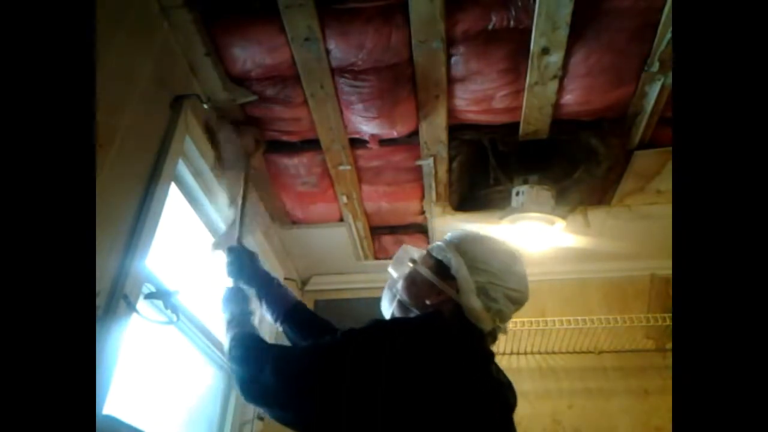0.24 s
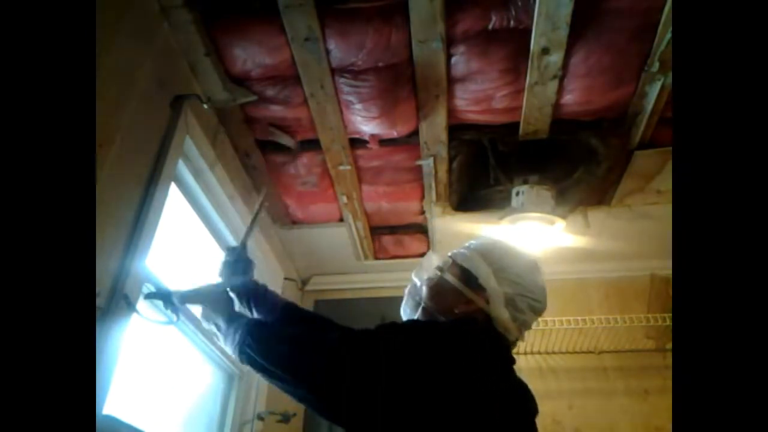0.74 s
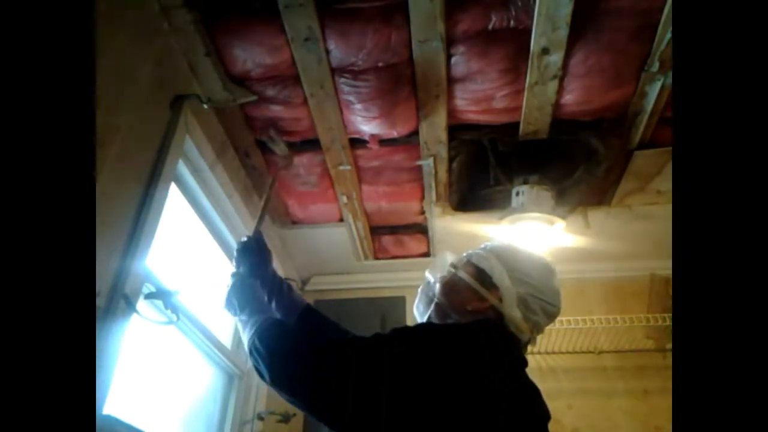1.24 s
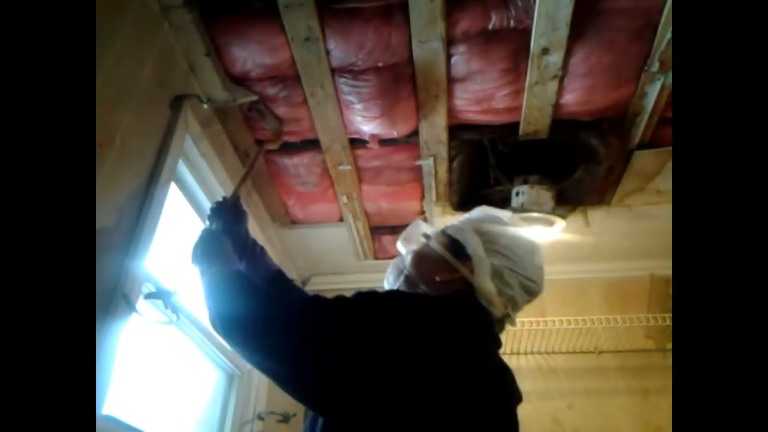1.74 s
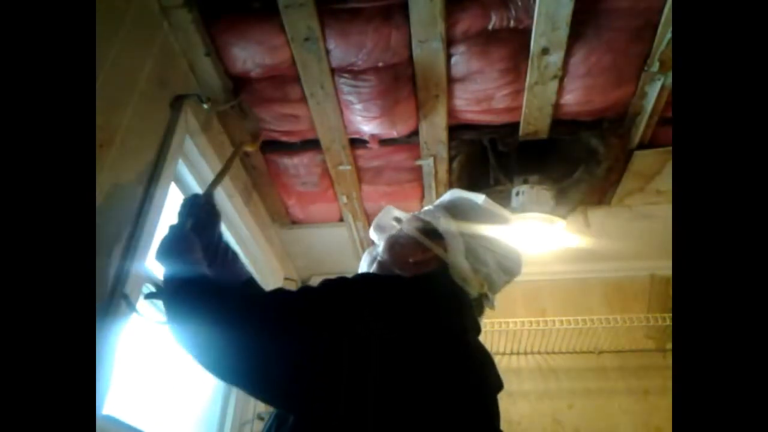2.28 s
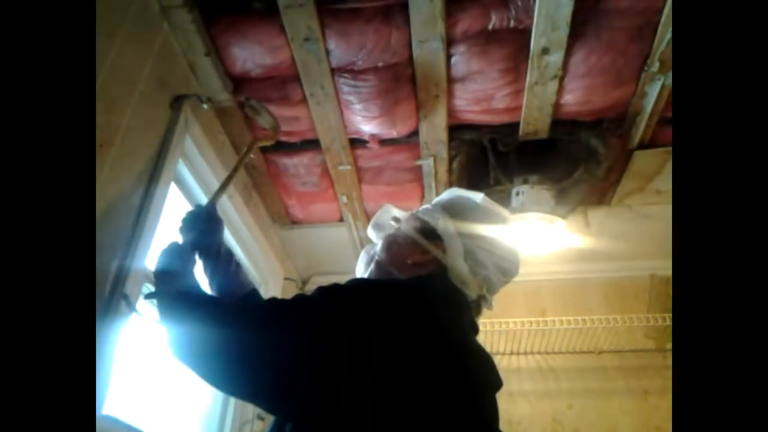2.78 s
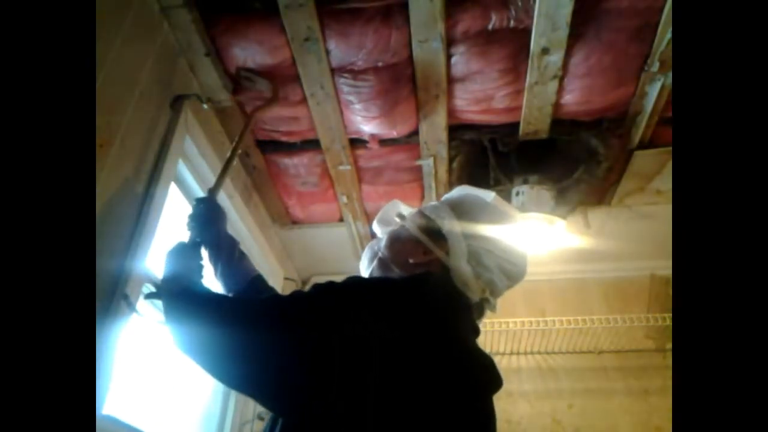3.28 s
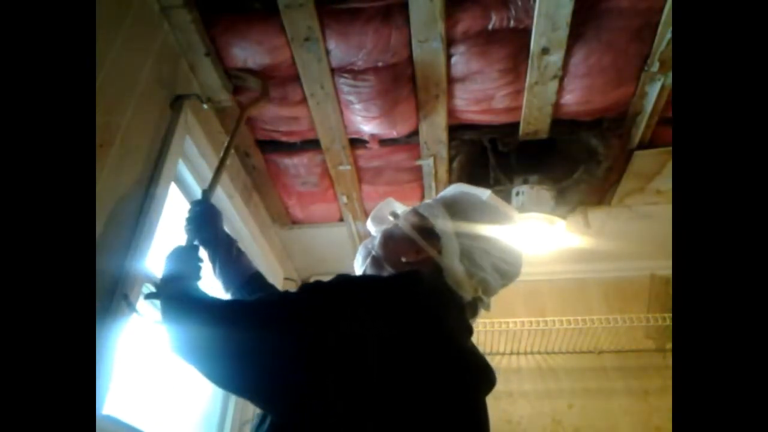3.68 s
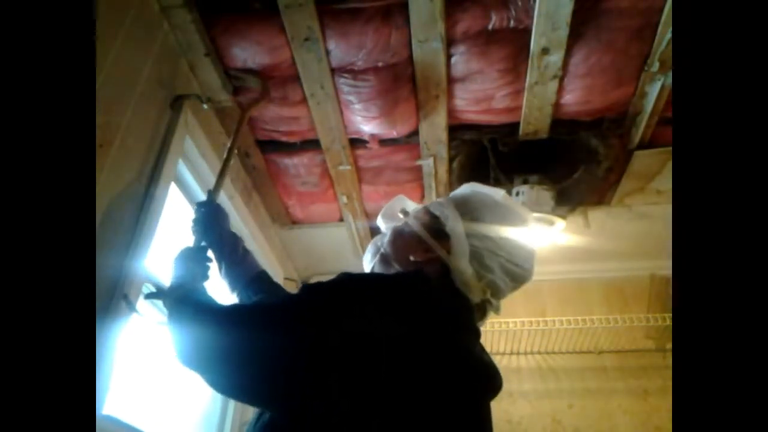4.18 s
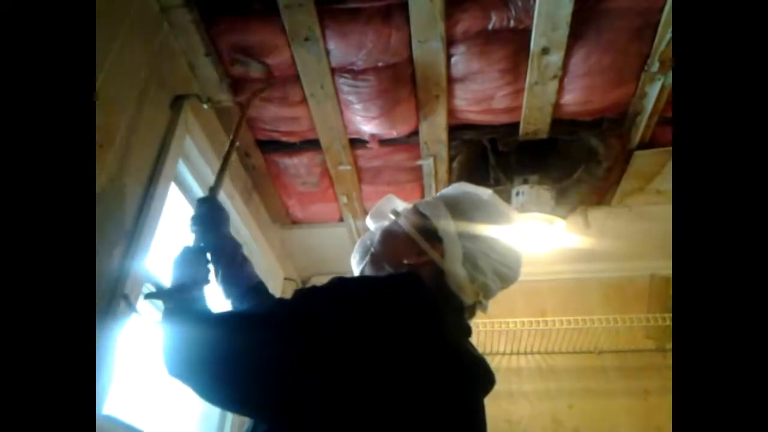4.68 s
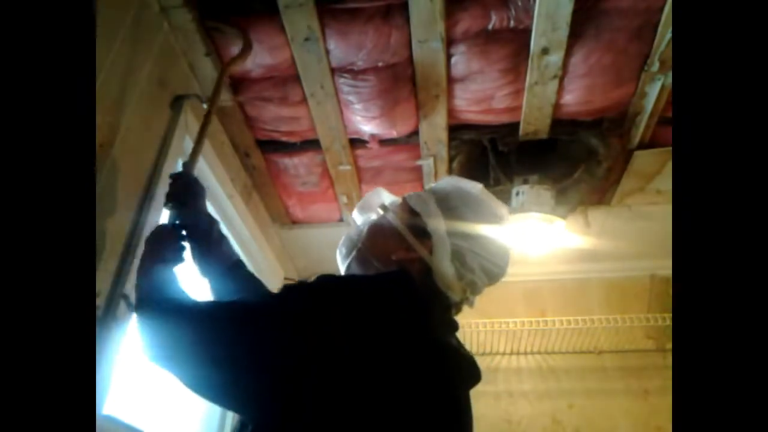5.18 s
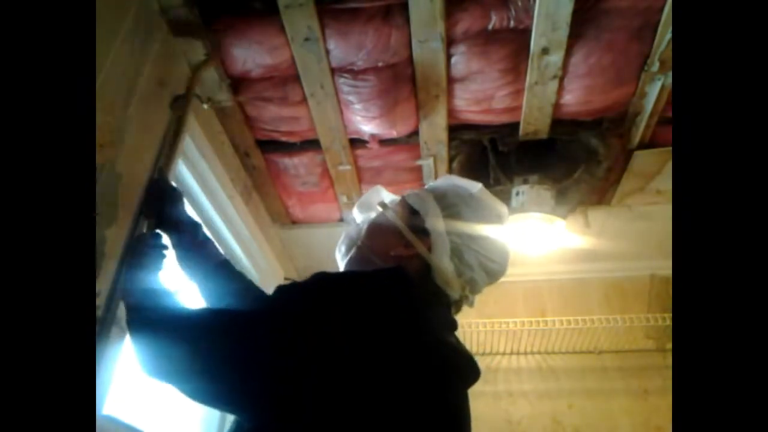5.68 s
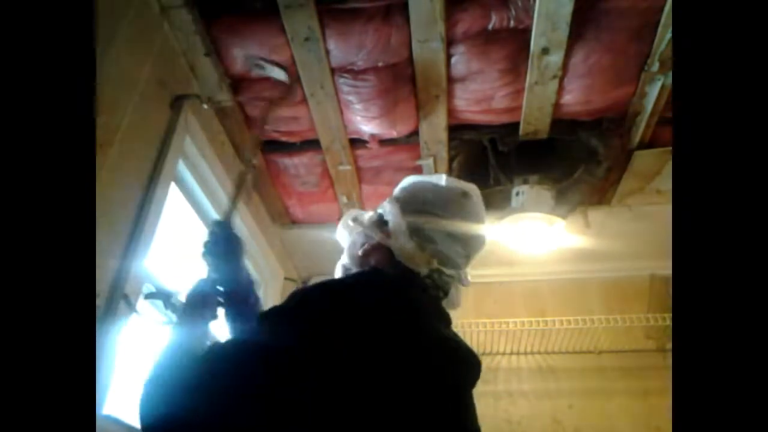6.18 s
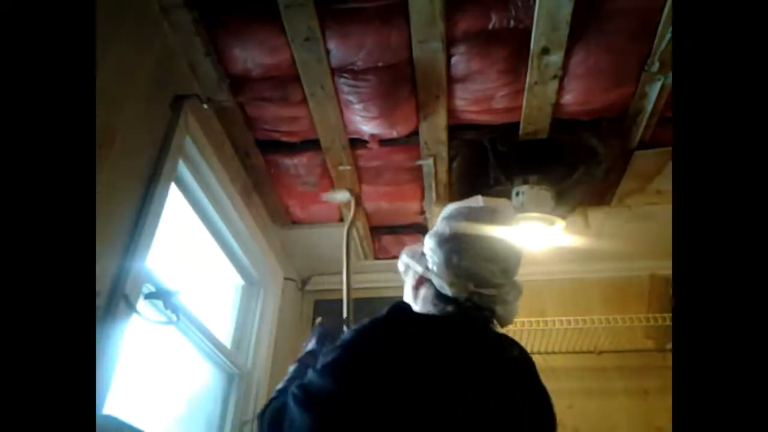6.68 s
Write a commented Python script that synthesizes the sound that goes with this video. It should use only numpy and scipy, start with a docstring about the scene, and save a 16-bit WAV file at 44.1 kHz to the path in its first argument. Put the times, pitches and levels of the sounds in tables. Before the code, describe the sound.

Someone pries at an opened ceiling with a metal bar: clustered woody bangs, gritty drags, crumbling fizz and quieter pauses in a small room.

```python
"""A steel crowbar knocks, hooks and drags along the laths and joists of an opened ceiling in a small hard room.
Each blow is a burst of noise that cracks and shakes the boards, with fading sines for the thud in the joists.
The dragging bar is a stream of random clicks, filtered into scrape, rumble and fizz of crumbs and thin top hiss.
Over a soft room tone, two close microphone ports hear it all, the right one a moment sooner."""
import sys
import numpy as np
from scipy import signal
from scipy.io import wavfile
from scipy.ndimage import uniform_filter1d

SR = 44100
rng = np.random.default_rng(int(sys.argv[2]) if len(sys.argv) > 2 else 0)


def transcribe(u):
    """Save the signal u as a 16-bit wav file named by the first command-line argument.

    u: samples, shape (n,) or (channels, n), limited to [-1, 1]; the rate is SR.
    q: integer samples, one column per channel.
    """
    v = np.clip(np.atleast_2d(u).T, -1, 1)
    q = np.round(v * 32767).astype(np.int16)
    wavfile.write(sys.argv[1], SR, q)


N = 306054  # length of the scene in samples

# Spectra that set only the balance of a sound: (frequency [Hz], level [dB per Hz])
# Quiet sound of the room, and noise of the microphone ports
ROOM_TONE = [(18, -23), (30, -14), (53, -23), (82, -30.5), (146, -11), (309, 1), (777, -5), (1950, 1),
             (2520, 0), (3260, 6.5), (5000, -21.5), (6500, -44.5), (11000, -120)]
PORT_HISS = [(20, -4), (60, -19), (150, -12.5), (400, -4.5), (1900, -9.5), (3300, -15), (8000, -8),
             (13000, -7.5), (15000, -6.5)]
# Scraping: gritty lath, shaken joists, fizzing crumbs, thin hiss at the top of the treble
GRIT = [(410, -42.5), (700, -10.5), (787, -21), (933, -9), (1350, -8.5), (1500, -8.5), (2100, -5),
        (2580, 0.5), (2870, 6), (5010, -20), (6000, -31.5), (7800, -41.5), (13200, -120)]
RUMBLE = [(53, -54), (90, -26), (136, -8), (187, 1), (437, 5.5), (786, -5), (900, -7), (1170, -55.5),
          (1980, -120)]
CRUMBS = [(3240, -25.5), (5500, -5), (6020, -7), (6840, -7), (8440, -5), (10000, -12), (13000, -41.5),
          (22000, -120)]
TOP_HISS = [(5880, -30.5), (10000, 1.5), (10700, -9.5), (13900, 7.5), (15000, -8.5)]
# Blows: splintering crack, shaken boards, hard bright edge (also used for the chips)
CRACK = [(900, -19.5), (1600, -10.5), (2000, 7), (2400, 7), (3000, 13), (3600, 3.5), (4200, 1.5),
         (5000, -3.5), (6500, -10.5), (10000, -49)]
BOARD = [(350, -19), (600, 0), (698, -5), (760, -4.5), (889, -3.5), (993, -3), (2000, -4.5), (2600, -45.5),
         (4400, -120)]
EDGE = [(2590, -26), (4400, 7.5), (5690, -5.5), (6140, -6.5), (8230, -12), (10100, -26), (14100, -25),
        (15000, -32)]
# How long echoes take to drop by 60 dB, never under 0.05 s: (frequency [Hz], time [s])
ECHO_TIME = [(100, 0.33), (260, 0.12), (700, 0.28), (1840, 0.27), (4850, 0.3), (8000, 0.35), (11000, 0.036)]
# Response of the small capsule behind its port: (frequency [Hz], gain [dB])
CAPSULE = [(20, -15), (60, -17.5), (100, -13), (130, -1.5), (1700, -5), (2000, -6.5), (2550, -5.5),
           (2950, -13.5), (3300, -7.5), (3800, -4.5), (5000, -4)]
# Blurred noise that follows the sound, different left and right: (frequency [Hz], gain [dB])
BLUR = [(30, -2.5), (70, -5), (150, -22), (1000, -30), (3000, -17), (6000, -26), (9000, -15), (14000, -1.5)]
# Ringing tones of the joists; RING_FACTOR scales the times to drop by 60 dB:
# (frequency [Hz], level [dB], unscaled time [s])
JOISTS = [(150, -7, 0.053), (165, 0, 0.1), (227, 6, 0.064), (264.2, 2, 0.079), (314.4, 9, 0.056),
          (365.6, 0.5, 0.066), (422.8, 8, 0.057), (465.5, 0, 0.088), (510.4, -3, 0.13), (552.2, -4, 0.11),
          (627, 4.5, 0.048)]
# Drags of the bar: (loudest time [s], swell [s], fade [s], drag level [dB],
#  rumble over drag [dB], fizz over drag [dB])
STROKES = [(0.029, 0.09, 0.043, -31.5, -7.5, -14.5), (0.127, 0.036, .02, -24.5, -21, -15.5),
           (0.445, 0.12, 0.027, -34.5, -5, -12), (0.815, .12, .02, -41, -14, -22),
           (0.945, .05, 0.022, -44, -8, -16), (1.285, 0.15, 0.046, -46.5, -39, -20),
           (1.57, 0.18, 0.65, -23.5, -8.5, -30), (1.77, 0.03, 0.19, -35, -24, -14),
           (1.901, 0.098, .04, -31.5, -5, -17), (2.139, 0.19, 0.067, -29.5, -15.5, -17),
           (2.19, 0.15, 0.031, -26, -29, -31), (2.34, 0.16, 0.5, -29, -16.5, -18),
           (2.47, 0.13, 0.02, -31, -24, -10.5), (2.92, 0.02, 0.36, -49.5, -16, -33),
           (3.071, 0.14, 0.025, -44, -12.5, -13), (3.194, .03, 0.048, -44, -10, -11),
           (3.341, 0.11, 0.038, -35, -2.5, -41), (3.501, 0.17, 0.026, -26, -11, -20),
           (3.649, 0.08, 0.17, -35.5, -18, -21), (3.799, 0.041, 0.052, -45, -11, -27),
           (3.88, 0.023, 0.072, -54, -21, -32), (3.995, 0.13, 0.024, -41.5, -18, -18),
           (4.159, 0.062, 0.9, -43.5, -34, -8.5), (4.328, 0.21, 0.29, -37, -12, -26),
           (4.795, .02, 0.045, -57, -2, -9), (4.96, 0.056, 0.025, -29.5, -20, -20),
           (5.08, 0.071, .1, -53, -26, -25), (5.23, 0.1, 0.031, -39, -17.5, -15),
           (5.341, 0.058, 0.24, -42, -18, -16), (5.67, 0.087, 0.028, -24.5, -9.5, -19),
           (5.99, 0.079, 0.12, -51.5, -7, -20), (6.172, 0.11, 0.066, -40, -12.5, -23),
           (6.39, 0.028, 0.018, -60, -7, -26), (6.455, 0.03, .12, -67, -16, -14.5),
           (6.65, 0.34, .02, -40, -22, -21), (6.74, 0.025, 0.15, -50, -3, -11),
           (6.935, 0.037, 0.034, -43.5, -10.5, -20.5)]
# Blows of the bar: (time [s], crack level [dB], crack pitch [Hz], thud level [dB], thud centre [Hz],
#  board level [dB], board pitch [Hz], edge level [dB], contact fade [s], extra room level [dB],
#  rise [s], steel snap over crack [dB], thud breadth [octaves])
BLOWS = [(0.0034, -29.5, 2650, -36.5, 468, -38, 1510, -59, 0.0027, -2, 0.007, -18, 0.94),
         (0.14, -15, 2260, -17.5, 420, -19, 1510, -41, 0.013, 3.5, 0.0033, -12.5, 0.8),
         (0.2436, -26, 2560, -26.5, 286, -33.5, 1160, -36, 0.012, 1.5, 0.0025, -14, 0.72),
         (0.318, -32.5, 3600, -33, 310, -35, 875, -38.5, 0.0095, 2, 0.0032, -5, 0.78),
         (0.391, -17, 3070, -45, 347, -39, 1700, -26.5, 0.014, 2.5, 0.0024, -8, 0.8),
         (0.4574, -11.5, 2760, -22.5, 255, -17.5, 1060, -23.5, 0.011, 14, 0.0041, -4, 0.8),
         (0.4696, -10.5, 2536, -26, 581, -14.5, 1020, -33, 0.01, -1.5, 0.003, -5, 0.97),
         (0.5721, -28.5, 4100, -36.5, 593, -34, 950, -43, 0.011, 4, 0.0045, -4, 0.76),
         (0.675, -29, 2530, -35, 270, -34.5, 950, -38, 0.0041, 10.5, 0.0031, -17, 0.94),
         (0.825, -20.5, 4090, -34, 466, -31, 1540, -24.5, 0.012, 7.5, 0.0033, -17, 0.8),
         (0.955, -18.5, 2800, -50, 252, -36, 1200, -27, 0.018, 9.5, 0.0017, -14, 0.64),
         (1.2145, -46, 2810, -70, 323, -72, 1540, -82.5, 0.008, -2.5, 0.0037, -6, 0.8),
         (1.3898, -13, 2820, -19, 533, -21.5, 1500, -35.5, 0.013, -5.5, 0.0034, -12, 1),
         (1.4015, -11, 2620, -12, 381, -21, 1550, -19, 0.008, 2.5, 0.0024, -9.5, 1),
         (1.4469, -2, 2730, -11.5, 530, -13, 869, -11.5, 0.0074, 5, 0.003, -4, 0.98),
         (1.5693, -28, 2670, -41, 565, -18, 1390, -45, 0.009, 4.5, 0.0028, -11, 0.92),
         (1.5897, -20, 2480, -25, 244, -22, 980, -46, 0.0094, 12, 0.0023, -12, 0.54),
         (1.7497, -25, 3320, -41, 283, -32, 1240, -36, 0.008, 14, 0.0036, -4, 0.73),
         (1.919, -32, 3060, -18, 252, -30.5, 910, -46, 0.0093, 0.5, 0.0035, -8, 0.87),
         (2.19, -25.5, 2490, -35, 215, -41.5, 999, -32.5, 0.0071, 0.5, 0.0042, -5, 0.91),
         (2.3736, -24.5, 3140, -38, 450, -32, 1100, -29.5, 0.0071, 3.5, 0.0038, -1, 0.93),
         (2.4209, -27.5, 2880, -34.5, 600, -37.5, 1380, -28.5, 0.006, 1.5, 0.0023, -8, 0.74),
         (2.462, -18.5, 2480, -37, 223, -28, 1280, -35.5, 0.008, -10.5, 0.0031, -7, 0.59),
         (2.5035, -7.5, 2670, -12.5, 420, -11, 1200, -36, 0.0035, -1, 0.0031, -3.5, 0.72),
         (2.5124, -12.5, 2610, -16, 307, -10, 1105, -24, 0.0044, -1, 0.0029, 1.5, 0.68),
         (2.524, -15, 1890, -9, 464, -26.5, 1200, -31.5, 0.008, 10, 0.003, -8, 0.57),
         (2.5477, -20.5, 2360, -20, 428.4, -19.5, 1240, -27, 0.008, 2.5, 0.003, -1, 0.5),
         (2.677, -24, 2430, -31, 390, -30, 1030, -39, 0.0073, -0.5, 0.00304, -5.5, 0.86),
         (2.7329, -16.5, 4220, -21, 493, -25, 1590, -32, 0.0077, -5.5, 0.0021, -3.5, 0.9),
         (2.751, -24.5, 2560, -25, 580, -22, 980, -30.5, 0.0063, -1, 0.0033, -10, 0.94),
         (3.0826, -29.5, 1975, -39, 328, -37, 1490, -63, 0.0084, -1.5, 0.003, -7, 0.69),
         (3.2543, -3, 2630, -20.5, 547, -13.5, 1400, -23, 0.016, 3.5, 0.0032, -15, 1),
         (3.4032, -29, 3250, -45, 353, -38.5, 1790, -51, 0.0067, 9, 0.003, -2, 0.8),
         (3.5151, -15.5, 2500, -17.5, 190, -20.5, 695, -23.5, 0.0064, -0.5, 0.0022, -5, 1),
         (3.5228, -9, 2450, -16, 342, -20, 880, -40, 0.01, -2, 0.0037, -16, 0.97),
         (3.9816, -38.5, 3230, -64, 594, -66, 1450, -56, 0.008, -6, 0.0028, -13, 0.94),
         (3.9895, -50.5, 2440, -64, 355, -53, 1560, -45, 0.0061, -3, 0.003, -8, 0.8),
         (4.117, -41.5, 2580, -63, 240, -55, 1800, -46.5, 0.011, -1, 0.0032, -8, 0.8),
         (4.146, -35, 2500, -65, 517, -47, 1800, -44, 0.007, 3, 0.003, -8, 0.8),
         (4.1704, -31, 3480, -62, 598, -54, 1520, -48.5, 0.0072, 5, 0.0027, -7, 0.8),
         (4.2426, -32.5, 2580, -61.5, 598, -51, 1720, -34, 0.0051, 13.5, 0.003, -6, 0.8),
         (4.359, -28, 4200, -49, 567, -38.5, 1480, -32, 0.0065, 2, 0.003, -6, 0.8),
         (4.4319, -9.5, 2105, -8.5, 400, -13, 1480, -41, 0.0027, 7, 0.003, -4.5, 0.8),
         (4.4494, -12, 3280, -11, 437, -16, 1490, -35, 0.0038, 4, 0.0031, -3.5, 0.87),
         (4.789, -43, 4230, -60, 533, -51.5, 1170, -64, 0.01, 3, 0.0032, -2.5, 0.8),
         (4.899, -46, 3160, -71, 560, -54, 1220, -49, 0.0098, 12, 0.003, -4, 0.76),
         (4.9735, -22.5, 2410, -30.5, 297, -31.5, 1410, -33, 0.008, 0.5, 0.003, -11, 0.94),
         (5.066, -38, 2520, -67, 390, -56, 1180, -63, 0.011, 1, 0.003, -5, 0.8),
         (5.2145, -38, 2700, -56, 234, -47.5, 1660, -62, 0.011, -8, 0.003, -14, 0.68),
         (5.2962, -27.5, 2470, -50, 445, -37, 1600, -54, 0.008, 6.5, 0.004, -17, 0.93),
         (5.4043, -21, 2830, -40.5, 220, -34, 1600, -30.5, 0.013, -3.5, 0.0035, -8, 1),
         (5.4224, -27.5, 3470, -35, 161, -38, 1370, -45, 0.006, -4, 0.0024, -8, 1),
         (5.582, -39, 2480, -55, 576, -47.5, 1710, -46, 0.0072, 9, 0.0021, -10, 0.8),
         (5.7403, -9, 2490, -9, 338, -13, 1770, -15, 0.008, -5, 0.0018, -7, 0.77),
         (5.7444, -14.5, 2090, -14, 269, -12, 1060, -18.5, 0.004, 3.5, 0.0039, -3, 0.58),
         (5.7734, -10, 2440, -12, 416, -12.5, 1300, -35, 0.0055, 7.5, 0.0038, -16, 0.52),
         (5.8064, -14.5, 2470, -9.5, 294, -14.5, 1540, -37, 0.0039, -2.5, 0.0038, -11.5, 0.88),
         (6.249, -50.5, 2500, -68, 326, -57, 1600, -66, 0.008, 2.5, 0.003, -1, 0.8),
         (6.325, -39, 2200, -77, 546, -49.5, 1484, -52, 0.015, 9, 0.0031, -5, 0.96),
         (6.437, -44, 2115, -70, 410, -57, 1596, -56, 0.018, 6, 0.004, -7, 0.8),
         (6.585, -39, 2750, -65, 344, -53, 1120, -57, 0.008, -1, 0.0028, -10, 0.88),
         (6.665, -24.5, 3140, -53, 540, -34.5, 1440, -45, 0.0059, 4.5, 0.0039, -2, 0.91),
         (6.749, -44, 3280, -59, 331, -45, 1780, -56, 0.008, 8, 0.003, -8, 0.8),
         (6.904, -50.5, 2320, -68, 505, -50, 1800, -62, 0.0042, 4, 0.003, -4, 0.8)]

ROOM_TONE_DB, HISS_DB = -57, -61.5
SWELL_DB = 25.5  # level change over one swell or fade time
TOP_HISS_DB = -6.5  # top hiss relative to crumbs
CHIPS_PER_S, CHIP_DB = 300, -15.5  # chips that snap under the hook; level relative to grit
RING_FACTOR = 0.9
KNOCK_DB = -7.0  # first knock relative to the thud
PORT_LAG = 1  # delay of the left port in samples
CUT_HZ = 14650  # top of the recorded band


def gain_of(db):
    """Turns decibels into a plain multiplier."""
    return 10 ** (np.asarray(db) / 20)


def evened(x):
    """Brings the average strength (RMS) to one."""
    return x / np.sqrt(np.mean(x ** 2) + 1e-20)


def read(points, hz):
    """Reads a table between its points, on a logarithmic frequency scale."""
    table_hz, value = np.transpose(points)
    return np.interp(np.log(hz + 1), np.log(table_hz + 1), value)


def add(mix, s, sound):
    """Adds a sound at a time in seconds, cut off at the end of the mix."""
    part = mix[round(s * SR):][:len(sound)]
    part += sound[:len(part)]


def colour(x, points):
    """Filters with the given spectrum, never below -90 dB, without sounding ahead of the input."""
    hz = abs(np.fft.fftfreq(8192, 1 / SR))
    log_gain = np.log(gain_of(np.maximum(read(points, hz), -90)))
    # The phase comes from the log gain, so the energy arrives as early as it can.
    spectrum = np.exp(np.conj(signal.hilbert(log_gain)))
    taps = np.fft.ifft(spectrum).real[:3000]
    taps = taps[(None,) * (x.ndim - 1)]
    return signal.fftconvolve(x, taps, axes=-1)[..., :x.shape[-1]]


def favour(x, centres_hz, sharpness, rest):
    """Lifts each row around its own pitch, like a resonance, and keeps some of the rest."""
    rows = []
    for row, hz in zip(x, centres_hz):
        b, a = signal.iirpeak(hz, sharpness, SR)
        rows.append(rest * row + signal.lfilter(b, a, row))
    return np.array(rows)


def ping(hz, t, turns):
    """A sine that swells until the given number of turns, then dies away."""
    cycles = hz[:, None] * t
    return np.sin(2 * np.pi * cycles) * cycles * np.exp(-cycles / turns)


def peaked(x, db):
    """Sets the loudest 9 milliseconds or so of each row to its level."""
    top = uniform_filter1d(x ** 2, 400, axis=1).max(1, keepdims=True)
    return x * gain_of(db)[:, None] / np.sqrt(top + 1e-20)


def room(count, wet_db, first_s):
    """Direct sound and dense echoes of random sign, each band dying at its own speed; one row per spot."""
    shape = (count, SR // 2)
    taps = rng.choice([-1., 1.], shape) * (rng.random(shape) < .3)
    hz, t, bands = signal.stft(taps, SR, nperseg=256)
    echo_time = np.maximum(read(ECHO_TIME, hz), .05)[:, None]
    tail = signal.istft(bands * gain_of(-60 * t / echo_time), SR, nperseg=256)[1]
    tail *= np.clip(np.arange(tail.shape[1]) / (first_s * SR), 0, 1)  # echoes build up
    tail *= gain_of(wet_db) / np.linalg.norm(tail, axis=1, keepdims=True)
    tail[:, 0] = 1  # direct sound
    return tail


def room_tone():
    """Steady noise with the spectrum of the quiet room."""
    return gain_of(ROOM_TONE_DB) * evened(colour(rng.standard_normal(N), ROOM_TONE))


def drag():
    """The hook rubs over grit: dense uneven clicks that ring the lath, shake the joists and fizz."""
    size = gain_of(1.5 * np.minimum(rng.exponential(1, (4, N)), 5)) * rng.standard_normal((4, N))
    clicks = size * (rng.random((4, N)) < 3000 / SR)  # about 3000 a second in each layer
    spectra = (GRIT, RUMBLE, CRUMBS, TOP_HISS)
    grit, rumble, crumbs, top_hiss = (evened(colour(c, p)) for c, p in zip(clicks, spectra))
    clumps = uniform_filter1d(rng.standard_normal(N), size=500)
    clumps = evened(uniform_filter1d(clumps, size=500))
    grit = evened(grit * gain_of(2.4 * clumps))  # the hook catches and slips
    top_hiss = top_hiss * gain_of(1.9 * clumps)
    chips = gain_of(2.7 * np.minimum(rng.exponential(1, N), 4)) * (rng.random(N) < CHIPS_PER_S / SR)
    grit = grit + gain_of(CHIP_DB) * evened(colour(chips, EDGE))
    fizz = crumbs + gain_of(TOP_HISS_DB) * top_hiss
    near = np.zeros(N)
    for s, swell, fade, drag_db, rumble_db, fizz_db in STROKES:
        first = max(round((s - 2 * swell) * SR), 0)
        last = min(round((s + 2 * fade) * SR), N)
        at = np.arange(first, last)
        # Distance from the loudest moment, counted in swell or fade times
        away = np.where(at < s * SR, (s - at / SR) / swell, (at / SR - s) / fade)
        stroke = grit[at] + gain_of(rumble_db) * rumble[at] + gain_of(fizz_db) * fizz[at]
        near[at] += gain_of(drag_db - SWELL_DB * away) * stroke
    echoes = room(count=1, wet_db=-1.5, first_s=0.012)[0]
    return signal.fftconvolve(near, echoes / np.linalg.norm(echoes))[:N]


def joist_thud(t, thud_hz, breadth, onset):
    """Fading sines of the joists; the place struck favours the tones near its thud centre."""
    count = len(thud_hz)
    thud = np.zeros((count, len(t)))
    phase = 2.56 * rng.random((count, len(JOISTS)))  # the tones start only partly out of step
    for k, (hz, db, t60) in enumerate(JOISTS):
        near_db = -9. * (np.log2(hz / thud_hz) / np.clip(breadth, .2, 2)) ** 2
        level_db = db + near_db[:, None] - 60 * t / (t60 * RING_FACTOR)
        thud += gain_of(level_db) * np.sin(2 * np.pi * hz * t + phase[:, k:k + 1])
    thud *= onset * (1 - np.exp(-t / 0.0051))  # heavy timber gathers speed slowly
    echoes = room(count=count, wet_db=-8.5, first_s=0.022)
    return signal.fftconvolve(thud, echoes, axes=1)[:, :len(t)]


def blows():
    """A burst of splintering contact drives the boards, while the joists thud and the steel snaps."""
    (s, crack_db, crack_hz, thud_db, thud_hz, board_db, board_hz, edge_db,
     length, room_db, rise, snap_db, breadth) = np.transpose(BLOWS)
    t = np.arange(SR // 2) / SR
    u = t / np.clip(length, .001, .05)[:, None]
    onset = 1 - np.exp(-(t / np.clip(rise, .0003, .02)[:, None]) ** 2)
    contact = rng.standard_normal(u.shape) * np.exp(-u) * onset
    # The walls answer with echoes scaled to the energy of the contact.
    answer = room(count=len(s), wet_db=-5.0, first_s=0.015)[:, :len(t)]
    answer = answer * (t > 0) * onset  # without the direct sound
    strength = np.linalg.norm(contact, axis=1) * gain_of(room_db)
    heard = contact + strength[:, None] * answer

    crack = favour(colour(heard, CRACK), crack_hz, sharpness=1.64, rest=0.54)
    board = favour(colour(heard, BOARD), board_hz, sharpness=12.0, rest=0.68)
    edge = colour(heard, EDGE)
    thud = joist_thud(t, thud_hz, breadth, onset)
    late = np.maximum(t - 0.628 * rise[:, None], 0)  # time since the bar bites
    snap = ping(crack_hz, late, turns=12.0)  # steel meets lath
    knock = ping(thud_hz, late, turns=1.0)  # the joist gives under the bar

    sound = peaked(crack, crack_db) + peaked(board, board_db)
    sound += peaked(edge, edge_db) + peaked(thud, thud_db)
    sound += peaked(snap, crack_db + snap_db) + peaked(knock, thud_db + KNOCK_DB)
    out = np.zeros(N)
    for start, one in zip(s - .0015, sound):  # each starts 1.5 ms ahead of its listed time
        add(out, start, one)
    return out


def blurred_noise(sound):
    """Noise that follows the sound, different left and right, strongest in the lowest bass and top treble."""
    smear = rng.standard_normal((2, 3000)) * np.exp(-np.arange(3000) / 700)
    smear /= np.linalg.norm(smear, axis=1, keepdims=True)
    return signal.fftconvolve(colour(sound, BLUR)[None], smear, axes=1)[:, :N]


def scene():
    """The left port hears all a moment later; blurred noise is added to both sides."""
    sound = room_tone() + drag() + blows()
    return np.array([np.roll(sound, PORT_LAG), sound]) + blurred_noise(sound)


def record(dry):
    """The capsule weakens the bass; each port adds hiss; peaks past full scale flatten; the top is cut off."""
    hiss = evened(colour(rng.standard_normal(dry.shape), PORT_HISS))
    wired = colour(dry, CAPSULE) + gain_of(HISS_DB) * hiss
    held = np.clip(wired, -1, 1)
    low_pass = signal.firwin(511, CUT_HZ, window=("kaiser", 9), fs=SR)
    return signal.oaconvolve(held, low_pass[None], "same")


dry = scene()
out = record(dry)
transcribe(out)
```